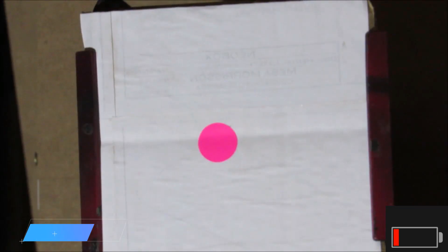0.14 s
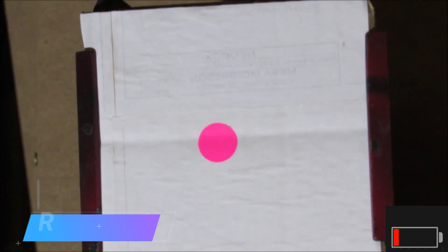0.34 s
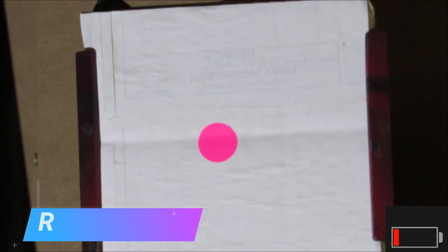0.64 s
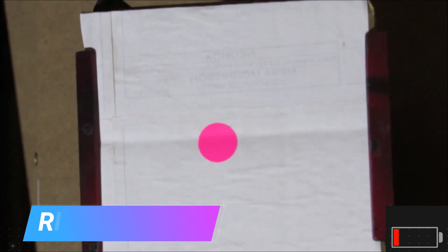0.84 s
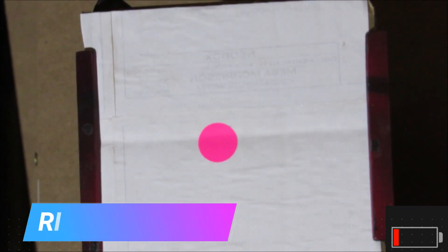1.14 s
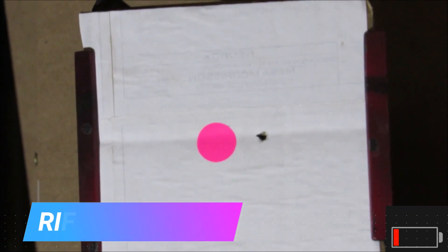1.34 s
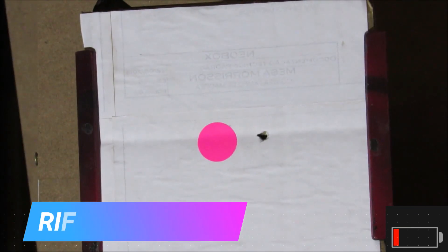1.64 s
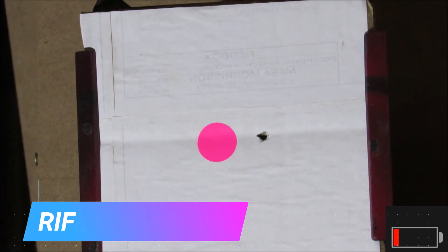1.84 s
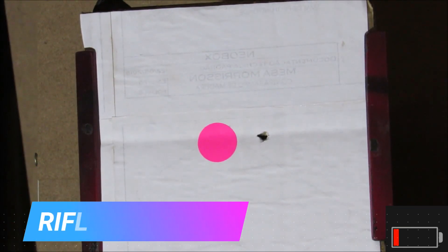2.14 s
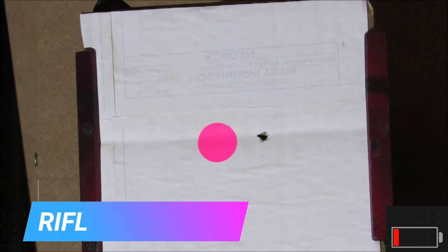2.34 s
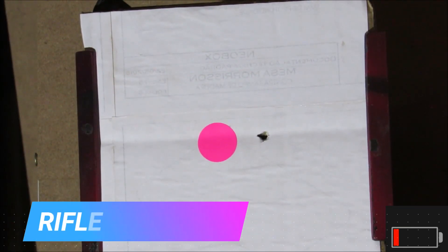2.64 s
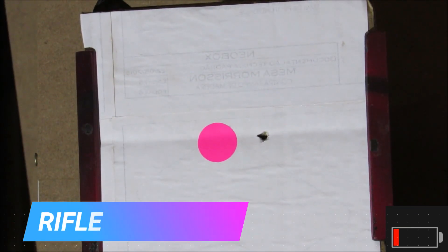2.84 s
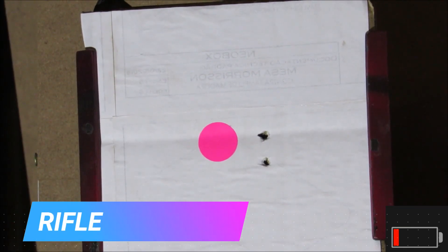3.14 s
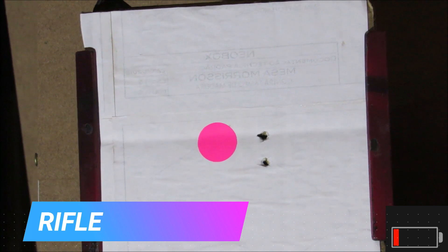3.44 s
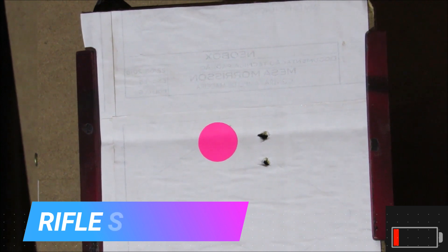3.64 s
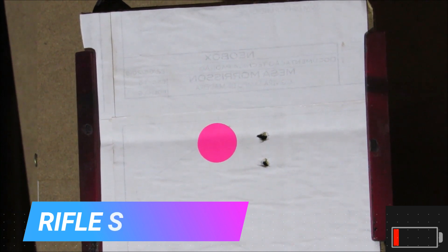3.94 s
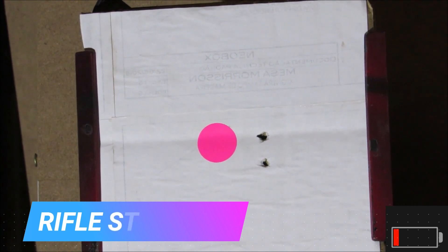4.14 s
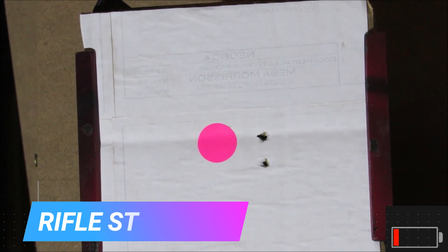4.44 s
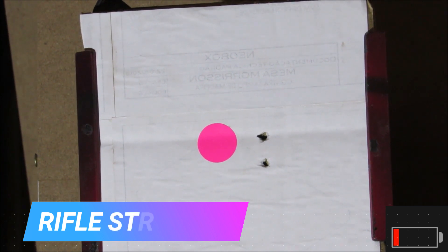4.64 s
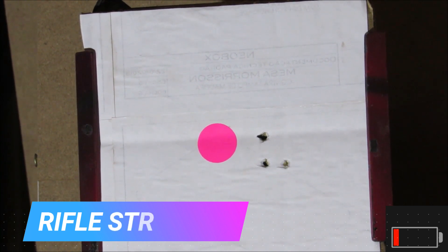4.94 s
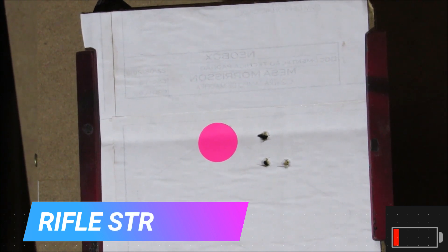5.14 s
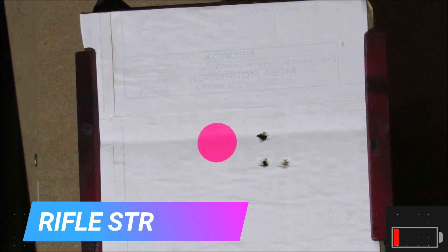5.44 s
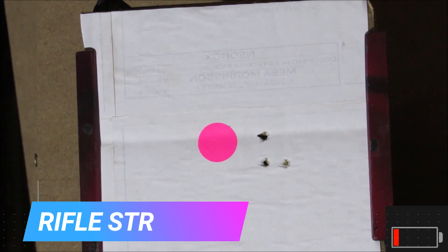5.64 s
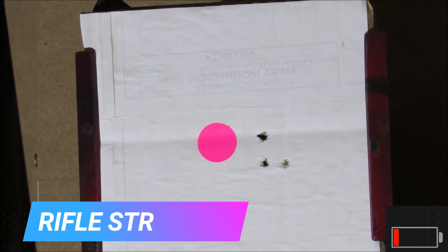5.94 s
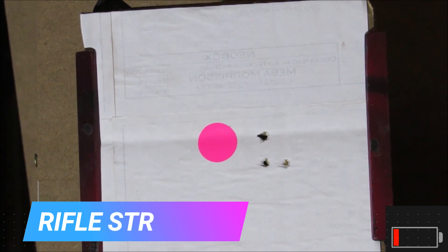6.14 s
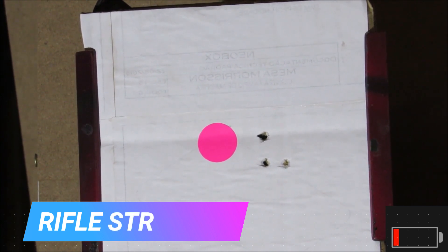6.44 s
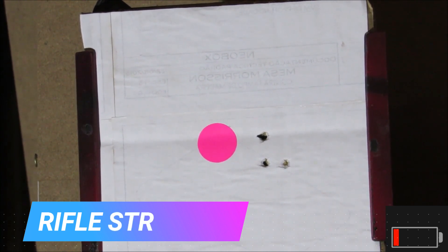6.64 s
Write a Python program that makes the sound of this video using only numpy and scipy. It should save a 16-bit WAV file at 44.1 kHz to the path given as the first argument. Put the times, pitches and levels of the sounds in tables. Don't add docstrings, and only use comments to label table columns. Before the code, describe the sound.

Three air rifle shots down a hard-walled indoor range, each cracking, ripping paper and clanging on a steel trap, over a low fan hum.

```python
import sys
import numpy as np
from scipy import signal
from scipy.fft import rfft, irfft, next_fast_len
from scipy.io import wavfile

SR = 44100
rng = np.random.default_rng(int(sys.argv[2]) if len(sys.argv) > 2 else 0)


def voltage_ratio(level):
    return 10 ** (np.asarray(level, float) / 20)


def store_wav(level_fs):
    pcm = np.round(np.clip(np.atleast_2d(level_fs), -1, 1) * 32767)
    wavfile.write(sys.argv[1], SR, pcm.T.astype(np.int16))


N = 299880


def along(points, hz):
    f, v = np.transpose(points)
    return np.interp(np.log(hz + 1), np.log(f + 1), v)


def unit(x):
    return x / np.sqrt(np.mean(x ** 2) + 1e-20)


def filtered(x, response):
    n = x.shape[-1]
    m = next_fast_len(n + 8192)
    return irfft(rfft(x, m) * response(np.fft.rfftfreq(m, 1 / SR)), m)[..., :n]


def modes(table):
    def response(f):
        total = 0
        for k, (centre, width, db) in enumerate(table):
            damping = 1j * f * width
            total = total + (-1) ** k * voltage_ratio(db) * damping / (centre * centre - f * f + damping)
        return total
    return response


def noise(n, spectrum, alike):
    def mid_side(hz):
        turn = np.arccos(np.clip(along(alike, hz), -1, 1)) / 2
        return spectrum(hz) * [np.cos(turn), np.sin(turn)]
    mid, side = filtered(rng.standard_normal((2, n)), mid_side)
    return unit(np.array([mid + side, mid - side]))


def wavelet(u, hz, width, phase):
    return np.exp(-(u / width) ** 2) * np.cos(2 * np.pi * hz * u + phase)


JOINS = [
    1.968,
    3.971,
    6.673,
    7,
]


def add(out, s, sound):
    end = JOINS[np.searchsorted(JOINS, s)]
    part = out[:, round(s * SR):round(end * SR)][:, :sound.shape[-1]]
    part += sound[..., :part.shape[-1]]


# t/s, peak level/dB, floor copy delay t/s, ceiling copy level/dB
SHOTS = [
    (1.21495, -1.4, .0012, -3.4),
    (2.87639, -0.1, .00133, -4.8),
    (4.90511, -1.5, .00124, -6.8),
]
# f/Hz, level/dB
BLAST = [(200, -34), (600, -8.5), (1200, -0.5), (2500, -8), (6000, -3), (9000, -2.5), (13000, -9),
         (16000, -19)]
# f/Hz, likeness (-1 to 1)
BLAST_ALIKE = [(60, 0.65), (130, 0.84), (290, 0.89), (640, 0.88), (1410, 0.96), (3100, 1.0), (6820, 0.64),
               (15000, 0.29)]
FLOOR_DB, CEILING_S = -.3, .00805


def muzzle():
    out, t = np.zeros((2, N)), np.arange(SR // 50) / SR
    blast = lambda f: voltage_ratio(along(BLAST, f))
    for shot_s, shot_db, floor_s, ceiling_db in SHOTS:
        # t/s, level/dB, spike width/s, t60 of the scattered copies/s, spike gain
        arrivals = [(shot_s, shot_db, .00008, .004, 1.1),
                    (shot_s + floor_s, FLOOR_DB, .00012, .012, 1.5),
                    (shot_s + CEILING_S, ceiling_db, .00008, .004, 1.1)]
        for s, db, width, rattle_t60, strength in arrivals:
            u = t - .001 + round(s * SR) / SR - s
            spike = wavelet(u, hz=7000, width=width, phase=0.026)
            spike = spike + 0.78 * wavelet(u, hz=2500, width=0.000067, phase=-1.79)
            rattle = voltage_ratio(-24.5 - 60 * u / rattle_t60) * (u > .0002) * noise(len(t), blast, [(1, 0.77)])
            add(out, s - .001, voltage_ratio(db - gain_db(s)) * (strength * spike + rattle))
        tail = hall(blast, BLAST_ALIKE, rise=0.0059, early_db=-19.5, early_t60=0.11)
        add(out, shot_s, voltage_ratio(-18.5) * tail)
    return out


# t/s, tear length t/s
PIERCE = [
    (1.2658, .0016),
    (2.9268, .0024),
    (4.9514, .0022),
]
# tear level/dB, puff level/dB, whistle level/dB, swell of the hiss/(dB per s)
PAPER = [
    (-12.5, -18.5, -18, 1500.5),
    (-14.5, -14.5, -45, 1500),
    (-14.5, -12.5, -41.5, 999.5),
]
# f/Hz, level/dB
TEAR = [(500, -24.5), (2000, -19), (5000, -3), (9000, -1), (13000, -0.5), (16000, -12)]
RIP_DB, PELLET_DB = 10, -22


def paper():
    out, u = np.zeros((2, N)), np.arange(-SR // 25, SR // 50) / SR
    alike = [(1000, 0.91), (8000, .85), (15000, .6)]
    for (s, length), (tear_db, puff_db, whistle_db, swell) in zip(PIERCE, PAPER):
        hiss = voltage_ratio(PELLET_DB + swell * u) * (u < 0)
        tear = voltage_ratio(tear_db - 6000 * np.maximum(u - length, 0)) * (u >= 0)
        steps = rng.standard_normal(len(u) // 6 + 1).repeat(6)[:len(u)]
        grain = voltage_ratio(1.3 * steps)
        rip = (hiss + tear) * grain * noise(len(u), lambda f: voltage_ratio(along(TEAR, f)), alike)
        rip = rip + voltage_ratio(tear_db + RIP_DB) * wavelet(u, hz=9500, width=.00012, phase=.6)
        late = np.maximum(u - length + .0004, 0)
        puff = voltage_ratio(puff_db + 6 - 60 * late / .011) * np.sin(2 * np.pi * 300 * late)
        whistle = voltage_ratio(whistle_db) * wavelet(u - length - .0025, hz=15300, width=.0015, phase=0)
        add(out, s + u[0], voltage_ratio(-gain_db(s)) * (rip + puff + whistle))
    return out


# t/s, peak level/dB
TRAP = [
    (1.27991, -0.0),
    (2.94136, -0.6),
    (4.96545, -0.7),
]
# knock share, splash level/dB, ring level/dB, wall echo level/dB, high sheen level/dB
AFTER = [
    (.8, -10.5, -16.5, -3, 3.5),
    (0.46, -10, -7, -4, -2),
    (0.64, -8.5, -9, -9, 1),
]
# f/Hz, level/dB
SPLASH = [(500, -16), (2000, -1), (4500, 1.5), (8600, 6), (11000, -5.5), (16000, -5)]
# f/Hz, width/Hz, level/dB
PLATE = [(4520, 170, -3), (5300, 500, -6), (8870, 1200, -5)]
SPLASH_S, THUD_DB = .0014, -17


def trap():
    out, t = np.zeros((2, N)), np.arange(SR // 5) / SR
    alike = [(1000, 1.0), (3000, 1.0), (6000, 1.0), (15000, 0.56)]
    for (s, db), (knock, splash_db, ring_db, echo_db, _) in zip(TRAP, AFTER):
        u = t - .001 + round(s * SR) / SR - s
        blow = .6 * wavelet(u - .00005, hz=8000, width=.00015, phase=2.4)
        blow = blow + knock * wavelet(u - .0001, hz=2700, width=.00016, phase=1.7)

        v = np.maximum(u - SPLASH_S, 0)
        burst = (1 - np.exp(-v / .0004)) * voltage_ratio(-60 * v / .012)
        burst = burst + .25 * (u > 0) * voltage_ratio(-60 * u / .04)
        splash = burst * noise(len(t), lambda f: voltage_ratio(along(SPLASH, f)), alike)
        ring = filtered(splash, modes(PLATE))
        ring = ring / np.abs(ring).max()
        bright = voltage_ratio(db) * blow + voltage_ratio(splash_db) * splash + voltage_ratio(ring_db) * ring

        thud = voltage_ratio(THUD_DB - 60 * u / 0.021) * (u > 0) * np.sin(2 * np.pi * 400 * u + 3)
        frame = voltage_ratio(db - 60 * u / 0.01) * (u > 0) * np.sin(2 * np.pi * 2750 * u + 2)
        thud = thud + 0.3 * knock ** 2 * frame
        add(out, s - .001, voltage_ratio(-gain_db(s + .004)) * (bright + thud))

        smear = voltage_ratio(-60 * t / .02) * (1 - np.exp(-t / .001)) * rng.standard_normal(len(t))
        smear = smear[None] / np.linalg.norm(smear)
        echo = 1.1 * bright + signal.fftconvolve(bright, smear, axes=1)[:, :len(t)]
        echo = filtered(echo, lambda f: (1j * f / (1j * f + 3000)) ** 2)
        wall = s + .0106
        add(out, wall, voltage_ratio(echo_db - gain_db(wall)) * echo)
    return out


# f/Hz, width/Hz, level/dB of first, second, third pellet
STEEL = [(2730, 35, -4.5, -27, -20), (4295, 73, -5, -9.5, -9.5), (12050, 100, -13.5, -15.5, -19),
         (5575, 110, -8.5, -2, -2), (5920, 60, -7, -6, -0.5), (6160, 78, -9, -9.5, -6.5),
         (6960, 50, -2.5, -5.5, -20.5), (7400, 57, -11, 0, 7), (7640, 41, -9.5, -4, -12),
         (7995, 58, -13, 1.5, 3.5), (8325, 30, -5.5, -0.5, -3), (8690, 110, -13.5, 4.5, 2.5),
         (11400, 52, -5.5, -17, -14), (12950, 90, -2.5, -23.5, -22)]
# f/Hz, level/dB
CLANG = [(150, -12), (420, -2), (1100, -4.5), (2500, -7.5), (5500, -1.5), (8600, 2), (10000, -2.5),
         (16000, -9)]
TRAP_HALL_DB, RIM_DB = -7, 9.5
RIM_FOLLOWS = 0.11
SHEEN_DB, SHEEN_T60, SHEEN_GROWS = -41, .74, 4.5


def trap_tail():
    out, late = np.zeros((2, N)), np.arange(SR) / SR
    centres, widths, *woken = np.transpose(STEEL)
    for (s, _), (_, _, ring_db, _, sheen_db), levels in zip(TRAP, AFTER, woken):
        peaks = lambda f: sum(voltage_ratio(0.68 * level) / (1 + (2 * (f - c) / w) ** 2)
                              for c, w, level in zip(centres, widths, levels))
        spot = [(330, 5), (435, 6.5), (600, 1.5), (1100, RIM_DB + RIM_FOLLOWS * ring_db), (1800, 3.0),
                (11300, 2.5), (12000, sheen_db), (13200, sheen_db), (13900, 0.5)]
        colour = lambda f: voltage_ratio(along(CLANG, f) + along(spot, f)) * (1 + 2.2 * peaks(f))
        tail = hall(colour, HALL_ALIKE, rise=0.0075, early_db=14.5, early_t60=0.098)
        add(out, s, voltage_ratio(TRAP_HALL_DB) * tail)

        thin = lambda f: (f > 11200) * (f < 13300) * (.12 + peaks(f))
        fade = voltage_ratio(SHEEN_DB + SHEEN_GROWS * sheen_db - 60 * late / SHEEN_T60)
        add(out, s, fade * (1 - np.exp(-late / .02)) * noise(SR, thin, HALL_ALIKE))
    return out


# t/s, peak level/dB, brightness level/dB, wall echo level/dB, hall level/dB
CLACKS = [
    (5.8345, -31, -11, -24, -1.5),
    (6.0292, -57.5, -25, -8, -3),
    (6.1896, -28.5, -6, -9.5, -1.5),
]
# f/Hz, width/Hz, level/dB
BOLT = [
    [(1317, 54, -1), (1870, 60, -2), (2260, 77, -2.5), (3250, 97, 0.5), (4230, 170, -3.5), (5340, 100, -2)],
    [(1130, 110, 2), (2310, 60, -6), (4330, 60, -8)],
    [(815, 57, -7), (1597, 180, 1.5), (2340, 60, -2), (3520, 340, 0), (5080, 80, -8), (5650, 87, -15),
     (7900, 83, -16)],
]


def cocking():
    out, t = np.zeros((2, N)), np.arange(SR // 10) / SR
    for (s, db, bright_db, echo_db, hall_db), bolt in zip(CLACKS, BOLT):
        tint = [(400, -18.5), (1200, -2.5), (4000, -9.5), (6000, bright_db), (10000, bright_db - 8.5),
                (13000, bright_db - 27), (16000, bright_db - 33)]
        body = lambda f: voltage_ratio(along(tint, f)) * (0.28 + modes(bolt)(f))
        level = voltage_ratio(db - gain_db(s))

        late = np.maximum(t - .003, 0)
        blow = voltage_ratio(-60 * late / .018) * (1 - np.exp(-late / .00015)) * rng.standard_normal(len(t))
        knock = filtered(blow, lambda f: body(f) / (1 + 1j * f / 5000) ** 2)
        add(out, s - .0033, level * 1.4 * knock / np.abs(knock).max())

        bounce = noise(len(t), lambda f: np.abs(body(f)) * f / (f + 3000), HALL_ALIKE)
        bounce = bounce * voltage_ratio(-60 * t / 0.058) * (1 - np.exp(-t / .001))
        add(out, s + .013, level * voltage_ratio(echo_db) * bounce)
        tail = hall(lambda f: np.abs(body(f)), HALL_ALIKE, rise=0.0051, early_db=10.5, early_t60=0.42)
        add(out, s, level * voltage_ratio(hall_db - 23.0) * tail)
    return out


# t/s, peak level/dB, f/Hz, lower click level/dB, upper click share
TICKS = [
    (3.6242, -33.5, 7400, -6, .05),
    (3.6372, -35, 7500, -30, .18),
]
TICK_HALL_DB = -34.5


def trigger():
    out, t = np.zeros((2, N)), np.arange(SR // 10) / SR
    u = t - .002
    for s, db, tick_hz, low_db, upper in TICKS:
        tick = wavelet(u, tick_hz, width=0.00028, phase=0)
        tick = tick + upper * wavelet(u, 1.85 * tick_hz, width=0.00014, phase=0)
        tick = tick + voltage_ratio(low_db) * wavelet(u, hz=2600, width=0.00025, phase=0)
        add(out, s - .002, voltage_ratio(db - gain_db(s)) * tick)
        colour = lambda f: np.abs(modes([(tick_hz, 4000, 0)])(f)) ** 2
        tail = hall(colour, HALL_ALIKE, rise=0.0057, early_db=14, early_t60=0.14)
        add(out, s, voltage_ratio(db + TICK_HALL_DB - gain_db(s)) * tail)
    return out


# f/Hz, t60 t/s
HALL = [(150, .5), (450, 1.47), (1100, 1.52), (2000, 1.69), (3200, 1.35), (6000, 1.06), (9000, 0.76),
        (13500, 0.52), (16000, .3)]
# f/Hz, likeness (-1 to 1)
HALL_ALIKE = [(60, 0.66), (130, 0.81), (290, 0.64), (640, 0.92), (1410, 0.87), (3100, 0.97), (6820, 0.73),
              (15000, 0.2)]
# f/Hz, width/Hz, level/dB
CORNER = [(437, 98, 5.5), (703, 49, -11.5), (1020, 63, 4.5)]


def hall(colour, alike, rise, early_db, early_t60):
    spot = lambda f: voltage_ratio(sum(db * np.exp(-((f - c) / w) ** 2) for c, w, db in CORNER))
    source = noise(round(1.6 * SR), lambda f: colour(f) * spot(f), alike)
    hz, t, z = signal.stft(source, SR, nperseg=256)
    fade = voltage_ratio(-60 * t / along(HALL, hz)[:, None]) * (1 + voltage_ratio(early_db - 60 * t / early_t60))
    tail = signal.istft(z * fade, SR, nperseg=256)[1]
    return tail * (1 - np.exp(-np.arange(tail.shape[1]) / SR / rise))


# f/Hz, level/dB (per Hz)
FAN = [(13, -49.5), (22, -21.5), (49, -7), (83, -8.5), (109, -5), (184, -2), (328, -3), (387, -12),
       (539, -8), (690, -24.5), (861, -14), (1130, -13), (1380, -19), (9480, -53.5), (16000, -52)]
# f/Hz, width/Hz, level/dB
DUCT = [(59.7, 6.8, 5), (117.8, 8.9, 6.5), (194.4, 42, -0.5), (300, 22, -10.5), (376, 20, 6),
        (408, 24, 7.5)]
# f/Hz, likeness (-1 to 1)
FAN_ALIKE = [(60, 0.8), (130, 0.6), (290, 0.79), (640, 0.65), (1410, 0.84), (3100, 0.91), (6820, 0.56),
             (15000, -0.02)]
# t/s, level/dB
HISS = [
    (0, -62),
    (1.968, -65.5),
    (3.971, -68.5),
    (6.673, -71),
]
# f/Hz, level/dB
AIR = [(1500, -11), (4000, 3), (7000, 1.5), (11000, -3.5), (14000, -15), (16000, -19.5)]


def fan():
    t = np.arange(N) / SR
    humps = lambda f: 1 + sum(voltage_ratio(db) * np.exp(-((f - c) / w) ** 2) for c, w, db in DUCT)
    rumble = voltage_ratio(-34) * noise(N, lambda f: voltage_ratio(along(FAN, f)) * humps(f), FAN_ALIKE)
    hum = voltage_ratio(-46.5) * np.sin(2 * np.pi * 59.5 * t)
    starts, hiss_db = np.transpose(HISS)
    level = voltage_ratio(hiss_db[np.searchsorted(starts, t, "right") - 1])
    hiss = level * noise(N, lambda f: voltage_ratio(along(AIR, f)), FAN_ALIKE)
    return rumble + hum + hiss


def scene():
    near = filtered(paper() + trap() + trap_tail(), lambda f: 1j * f / (1j * f + 120))
    return muzzle() + near + cocking() + trigger() + fan()


FADES = [
    .002,
    .002,
    .015,
]
CRACK_DUCK_DB, BEFORE_PUFF_DB, PUFF_DUCK_DB, BEFORE_TRAP_DB, TRAP_DUCK_DB = -6, -4.5, -9.5, -16.5, -20.5
CRACK_FALL_S, PUFF_FALL_S, TRAP_FALL_S = .004, .002, .01
DEEPEST_DB, DEEPEST_S, CREEP_DB_PER_S, KNEE_DB, SLOW_DB_PER_S = -22, 0.15, 16.5, -12, 4


def gain_db(s):
    points = [(0, 0.059)]
    for (crack, *_), (pierce, length), (blow, _), join, fade in zip(SHOTS, PIERCE, TRAP, JOINS, FADES):
        puff = pierce + length + .0009
        deepest = blow + DEEPEST_S
        knee = deepest + (KNEE_DB - DEEPEST_DB) / CREEP_DB_PER_S
        points += [(crack, 0), (crack + CRACK_FALL_S, CRACK_DUCK_DB),
                   (puff, BEFORE_PUFF_DB), (puff + PUFF_FALL_S, PUFF_DUCK_DB),
                   (blow - .001, BEFORE_TRAP_DB), (blow + TRAP_FALL_S, TRAP_DUCK_DB)]
        for t in (deepest, min(knee, join - 2 * fade), join - fade):
            fast = DEEPEST_DB + CREEP_DB_PER_S * (t - deepest)
            slow = KNEE_DB + SLOW_DB_PER_S * (t - knee)
            points.append((t, fast if t < knee else slow))
        points.append((join + fade, 0))
    return np.interp(s, *np.transpose(points))


def roll_off(x):
    return signal.sosfilt(signal.butter(12, 16490, fs=SR, output="sos"), x)


# t/s, level/dB
EDITS = [
    (3.9714, -37),
    (6.674, -30.5),
]
# f/Hz, left minus right level/dB
LEAN = [(60, -4), (150, -4.5), (380, -4), (950, 0), (2380, 0.5), (5980, -0.5), (15000, 1.5)]
TOP_HZ, ROLL_HZ = 16150, 500


def record(dry):
    x = dry * voltage_ratio(gain_db(np.arange(N) / SR))
    for s, db in EDITS:
        add(x, s, voltage_ratio(db) * np.exp(-np.arange(200) / 30))
    ports = lambda f: voltage_ratio(along(LEAN, f) * [[.5], [-.5]])
    x = filtered(x, lambda f: ports(f) * np.clip((TOP_HZ - f) / ROLL_HZ, 0, 1) ** 2)
    x = x / (1 + np.abs(x) ** 8) ** (1 / 8)
    return roll_off(x)


dry = scene()
out = record(dry)
store_wav(out)
```